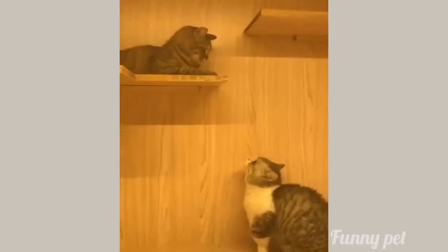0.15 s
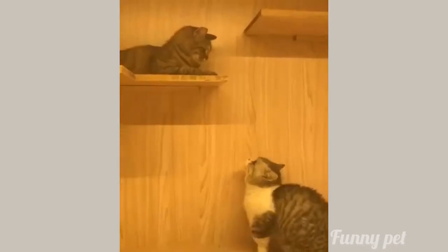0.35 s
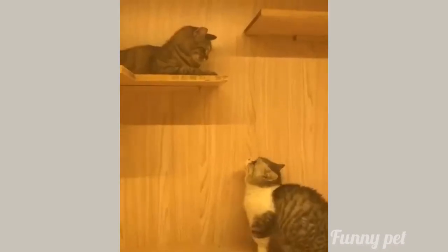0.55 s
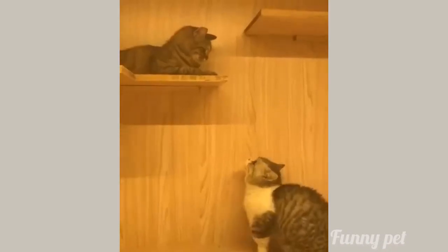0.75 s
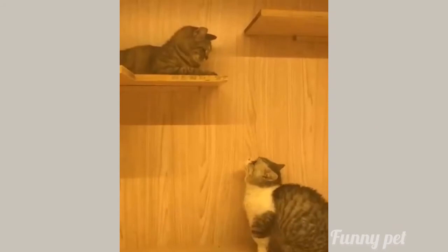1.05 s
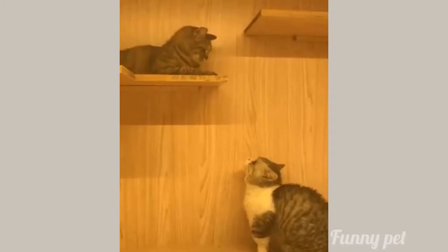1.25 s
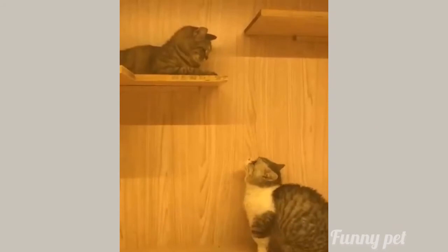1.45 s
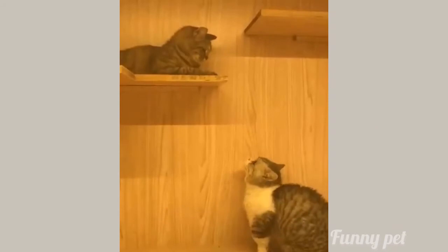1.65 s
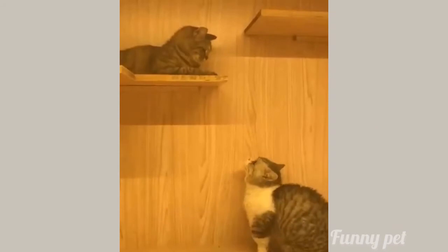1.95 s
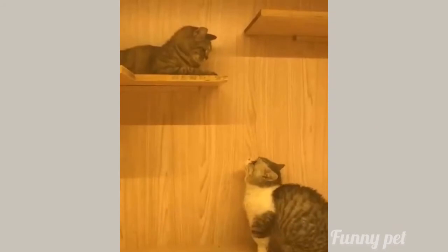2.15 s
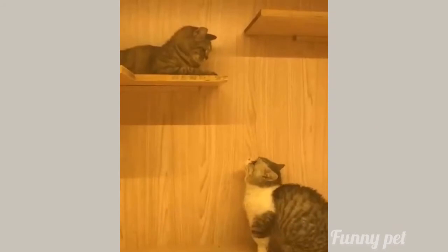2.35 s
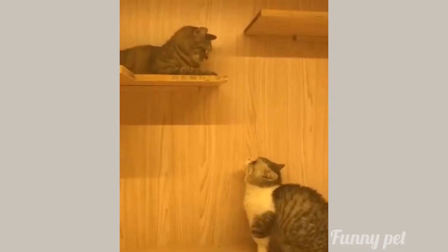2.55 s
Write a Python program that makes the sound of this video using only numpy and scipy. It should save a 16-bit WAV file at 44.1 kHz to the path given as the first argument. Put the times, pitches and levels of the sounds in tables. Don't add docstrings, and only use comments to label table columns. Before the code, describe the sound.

A cat's long yowl climbs in pitch, turns rough and stops with a cough of air; soft paw thumps follow, then a chirp and another cat's lower yowl, close phone microphone in a small wooden room.

```python
import sys
import numpy as np
from scipy import signal
from scipy.fft import rfft, irfft
from scipy.io import wavfile
from scipy.ndimage import uniform_filter1d

SR = 44100
rng = np.random.default_rng(int(sys.argv[2]) if len(sys.argv) > 2 else 0)


def master(y):
    cut = np.clip(np.atleast_2d(y).T, -1, 1)
    pcm = np.round(cut * 32767)
    wavfile.write(sys.argv[1], SR, pcm.astype(np.int16))


def rack_gain(trim_db):
    fader = np.asarray(trim_db, float)
    return 10 ** (fader / 20)


N = 119070
TIME_S = np.arange(N) / SR


def noise():
    return rng.standard_normal(N)


def band(x, lo_hz, hi_hz):
    sos = signal.butter(2, [lo_hz, hi_hz], "band", fs=SR, output="sos")
    y = signal.sosfilt(sos, x)
    return y / y.std()


def colour(x, points):
    point_hz, point_db = np.array(points, float).T
    hz = np.maximum(np.arange(N // 2 + 1) * SR / N, 1)
    gain = rack_gain(np.interp(np.log(hz), np.log(point_hz), point_db))
    return irfft(rfft(x) * gain, N)


def walk(rate_hz, size=N):
    hold = int(SR / rate_hz)
    steps = np.repeat(rng.standard_normal(size // hold + 1), hold)
    return 1.46 * uniform_filter1d(uniform_filter1d(steps, hold), hold)[:size]


def bell(centre_s, length_s):
    return np.exp(-((TIME_S - centre_s) / length_s) ** 2)


def gate(start_s, end_s, rise_s, fall_s):
    fade_in = np.clip((TIME_S - start_s) / rise_s, 0, 1)
    return fade_in * np.exp(-np.maximum(TIME_S - end_s, 0) / fall_s)


def table(rows):
    time_s, *columns = np.array(rows, float).T
    return [np.interp(TIME_S, time_s, c) for c in columns]


def hump(hz, centre_hz, width_hz):
    return 1 / (1 + ((hz - centre_hz ** 2 / hz) / width_hz) ** 2)


# (frequency [Hz], level [dB per Hz])
HUSH_SPECTRUM = [(20, 2), (141, -8), (600, -13), (1300, -13), (2200, -19), (3500, -27.5), (13000, -43)]
# (time [s], length [s], level [dB], frequency [Hz])
RUMBLES = [
    (0, 0.14, -30, 34),
    (0.77, 0.058, -37.5, 35.4),
    (1.198, 0.045, -53, 33.4),
    (1.328, 0.055, -47, 33.2),
    (1.386, 0.083, -38.5, 79.1),
    (1.78, 0.06, -44, 32.8),
    (1.972, 0.13, -46, 128),
    (2.34, 0.097, -49, 312),
    (2.455, 0.046, -45, 130),
]


def room_tone():
    hush = colour(noise(), HUSH_SPECTRUM)
    hush_gain = rack_gain(-44.5 + 1.17 * walk(8.6))
    low = 0
    for time_s, length_s, db, hz in RUMBLES:
        low = low + rack_gain(db) * bell(time_s, length_s) * band(noise(), hz * 0.893, hz * 1.112)
    fur = rack_gain(-59.5) * bell(2, 0.24) * band(noise(), 3050, 3800)
    return hush_gain * hush / hush.std() + low + fur


# (time [s], peak level [dB], pitch [Hz])
THUMPS = [
    (1.741, -33, 320),
    (1.77, -42, 550),
    (1.8, -38, 90),
    (1.93, -43, 600),
    (2.109, -31, 300),
    (2.145, -39, 600),
    (2.17, -38, 85),
]


def paw_thumps():
    turns, knock_db, knock_s = 3.4, -2, 0.018
    knock = band(noise(), 92, 840)
    out = np.zeros(N)
    for time_s, db, hz in THUMPS:
        since_s = np.maximum(TIME_S - time_s, 0)
        ring = np.sin(2 * np.pi * hz * since_s) * np.exp(-since_s * hz / turns)
        knock_gain = rack_gain(knock_db) * min(hz / 300, 1) ** 2
        contact = knock_gain * knock * np.exp(-since_s / knock_s)
        out += rack_gain(db) * (TIME_S > time_s) * (ring + contact)
    return out


# (time [s], level [dB])
SMACKS = [
    (1.882, -54),
    (1.931, -51),
    (2.149, -55.5),
    (2.277, -47.5),
]


def lip_smacks():
    length_s, centre_hz = 0.019, 10870
    hiss = band(noise(), centre_hz * 0.62, centre_hz * 1.9)
    return sum(rack_gain(db) * hiss * bell(time_s, length_s) for time_s, db in SMACKS)


def cough():
    start_s, hold_s, centre_hz = 1.035, 0.035, 1480
    air = band(noise(), centre_hz * 0.78, centre_hz * 1.21)
    air = air + 0.3 * band(noise(), 1600, 2930)
    air = air + 0.0193 * band(noise(), 12000, 13000)
    air = air + 0.2 * band(noise(), 280, 384)
    return rack_gain(-20) * air * gate(start_s, start_s + hold_s, 0.013, 0.014)


# (multiple of the pitch [1], level [dB])
CHIRP_PARTIALS = [(1, -0.5), (2, -5), (3, -6.5), (4, -20), (5, -27)]


def chirp():
    start_s, hold_s, rise_s, fall_s = 2.319, 0.025, 0.0038, 0.0039
    pitch_hz, sag_hz_per_s = 532, 1120
    since_s = np.maximum(TIME_S - start_s, 0)
    phase = 2 * np.pi * (pitch_hz * since_s - sag_hz_per_s * since_s ** 2 / 2)
    tone = -sum(rack_gain(db) * np.cos(k * phase) for k, db in CHIRP_PARTIALS)
    puff = rack_gain(-22) * (band(noise(), 2650, 3800) + 0.28 * band(noise(), 5000, 6900))
    return rack_gain(-15.5) * (tone + puff) * gate(start_s, start_s + hold_s, rise_s, fall_s)


# (time of return [s], level [dB])
CATCHES = [
    (.66, -5),
    (0.861, -9.5),
    (0.945, -2.5),
]
# (time [s], level [dB], length [s])
SWELLS = [(0.047, -6, 0.0089), (0.328, 4.5, 0.0049), (.384, 3.5, .012), (.424, -0.5, 0.012),
          (0.584, 0, 0.011), (0.66, 4.5, .008), (.69, 3, 0.0083), (0.719, -2.5, 0.019), (0.789, 3, 0.008),
          (0.881, 1, 0.0104), (.956, 4.5, 0.006), (0.97, -1.5, 0.0096), (1.004, -0.5, 0.0084),
          (2.395, 2, 0.0088), (2.473, 1.5, .02), (2.638, -4, 0.0089)]


def effort():
    sink_s = 0.014
    catch_db = np.zeros(N)
    for time_s, db in CATCHES:
        catch_db += db * np.exp(np.minimum(TIME_S - time_s, 0) / sink_s) * (TIME_S < time_s)
    swell_db = sum(db * bell(time_s, length_s) for time_s, db, length_s in SWELLS)
    return rack_gain(uniform_filter1d(catch_db, size=100) + swell_db)


# (frequency [Hz], level [dB])
TREBLE = [(1760, -35), (3000, -13), (4340, -13.5), (7000, -15), (8460, -21.5), (9330, -19), (10700, -49),
          (13000, -35)]
# (frequency [Hz], level [dB])
BREATH = [(2000, -40), (3200, -14), (5500, -6), (7200, -6), (8200, -14), (9500, -6), (13000, -9)]


def yowl(voice, mouth, skull, start_s, shut, notch_hz, nose_hz, edge):
    first_width_hz, second_width_hz, lower_width_hz, skull_width_hz = 293, 500, 454, 270
    notch_width_hz, notch_depth = 3700, 0.73
    top_partial, air_db, air_hz = 40, -3.5, 10600
    jitter, flicker, pulse_spread_rad = 0.001, 0.16, 1.2
    rasp_db, smear_hz = -3, 2000
    patch_db, patch_hz = 2.5, 2800

    end_s = voice[-1][0]
    a, b = max(int(start_s * SR), 0), min(int((end_s + 0.14) * SR), N)
    size = b - a
    pitch_hz, level_db = (c[a:b] for c in table(voice))
    first_hz, second_hz, second_db, lower_hz, lower_db, bright_db, half_db, rough = (
        c[a:b] for c in table(mouth))
    skull1_hz, skull1_db, skull2_hz, skull2_db, breath_db = (c[a:b] for c in table(skull))
    second_gain, lower_gain, bright, half = rack_gain(second_db), rack_gain(lower_db), rack_gain(bright_db), rack_gain(half_db)
    skull1_gain, skull2_gain = rack_gain(skull1_db), rack_gain(skull2_db)
    treble_hz, treble_db = np.array(TREBLE, float).T
    knee_hz = np.interp(bright_db, [-34, -26], [4600, 2900])
    notch = np.maximum(shut, np.interp(half_db, [-38, -20], [notch_depth, 0]))
    phase = 2 * np.pi * np.cumsum(pitch_hz * (1 + jitter * walk(59.8, size))) / SR

    tone, power = np.zeros(size), 0
    for k in range(1, 76):
        hz = k * pitch_hz
        pulse_pair = half if k % 2 else 1
        gain = hump(hz, first_hz, first_width_hz)
        gain = gain + second_gain * hump(hz, second_hz, second_width_hz)
        gain = gain + lower_gain * hump(hz, lower_hz, lower_width_hz)
        gain = gain + bright * np.interp(hz, treble_hz, rack_gain(treble_db)) / (1 + (knee_hz / hz) ** 8)
        rolloff = 1 / (1 + (k / top_partial) ** 16)
        airy_top = rack_gain(air_db) / (1 + (air_hz / hz) ** 16)
        gain = gain * pulse_pair * (hz < 13200) * (rolloff + airy_top)
        gain = gain + edge * np.minimum(half, 1) * hump(hz, 3350, 600)
        gain = gain * (1 - notch * hump(hz, notch_hz, notch_width_hz))
        gain = gain * (1 - shut * hump(hz, nose_hz, 300))
        if k < 50:
            bone = skull1_gain * hump(hz, skull1_hz, skull_width_hz)
            bone = bone + skull2_gain * hump(hz, skull2_hz, skull_width_hz)
            gain = gain + pulse_pair / np.maximum(half, 1) * bone
        gain = gain * rack_gain(patch_db * walk(22, size) / (1 + (patch_hz / hz) ** 6))
        power = power + gain ** 2 / 2

        angle = k * phase + pulse_spread_rad * rng.standard_normal()
        smeared = np.clip(rough * (1 + (hz / smear_hz) ** 2), 0, 0.9)
        rasp = rack_gain(rasp_db) * smeared
        in_phase = np.sqrt(1 - smeared ** 2) + rasp * walk(250, size)
        across = rasp * walk(250, size)
        partial = in_phase * np.sin(angle) + across * np.cos(angle)
        tone += gain * (1 + flicker * walk(25.46, size)) * partial

    air = colour(noise(), BREATH)
    breath = rack_gain(breath_db + 2 * walk(30, size)) * air[a:b] / air.std()
    out = np.zeros(N)
    out[a:b] = (tone / np.sqrt(power) + breath) * rack_gain(level_db)
    return out * gate(start_s, end_s, rise_s=0.0079, fall_s=0.022)


# (time [s], pitch of a pulse pair [Hz], level [dB])
SECOND_VOICE = [(2.29, 166.9, -46.5), (2.334, 172.3, -27), (2.376, 194, -29), (2.402, 204.5, -23.5),
                (2.442, 214.5, -29), (2.472, 218.5, -18.5), (2.542, 230.7, -20), (2.67, 234.1, -20.5),
                (2.7, 234.3, -18)]
# (time [s], main resonance [Hz], upper [Hz], upper [dB], lower [Hz], lower [dB],
# brightness [dB], half lines [dB], roughness [0-1])
SECOND_MOUTH = [(2.29, 1100, 1320, -30, 330, 4, -3, -28, 0.17),
                (2.36, 1345, 2000, -14.5, 915, -18, -25, -27, 0.048),
                (2.412, 1430, 2297, 1.5, 420, -23, -40, -31, 0.16),
                (2.471, 1576, 2400, 1, 870, -13.5, -48, 7.5, 0.043),
                (2.562, 1476, 2480, -2, 955, -43, -38, 3.5, 0.018),
                (2.629, 1743, 2740, -7, 987.6, -23, -29, -6.5, 0.014),
                (2.7, 1777, 2800, -10.5, 957, -32, -40, 1.5, 0.02)]
# (time [s], first resonance [Hz], first [dB], second [Hz], second [dB], breath [dB])
SECOND_SKULL = [(2.3, 5600, -35, 6500, -34, -27), (2.38, 5300, -43, 6500, -38, -33.5),
                (2.44, 5080, -42, 7800, -26, -38), (2.55, 5020, -26, 7630, -33, -40),
                (2.63, 5000, -32, 7860, -46, -32), (2.7, 5280, -34, 7700, -41, -37)]


def second_yowl():
    return yowl(SECOND_VOICE, SECOND_MOUTH, SECOND_SKULL, 2.28, shut=0.8,
                notch_hz=4300, nose_hz=690, edge=rack_gain(-12.5))


# (time [s], pitch of a pulse pair [Hz],
# level [dB])
FIRST_VOICE = [(0.0, 158.5, -20), (0.104, 153.1, -19), (0.174, 158.5, -21), (0.188, 161.4, -22),
               (0.286, 174.3, -19.5), (0.298, 180.5, -17), (0.41, 211.9, -18.5), (0.492, 261, -16),
               (0.53, 276.8, -12.5),
               (0.551, 279.3, -14.5), (0.606, 284, -15.5), (0.68, 290.5, -9.5), (0.776, 291.8, -10),
             (0.8, 296.5, -11.5), (0.906, 331.5, -8.5), (0.981, 346, -15), (1.006, 336.7, -14.5),
             (1.025, 307.3, -18.5), (1.079, 313.2, -26)]
# (time [s], main resonance [Hz], upper [Hz], upper
# [dB], lower [Hz], lower [dB], brightness [dB], half lines [dB], roughness [0-1])
FIRST_MOUTH = [(0, 590, 2600, -20, 320, -32.5, -27.5, -47, 0.2),
               (0.029, 690, 2700, -19, 320, -46, -32, -55, 0.01),
               (0.069, 965, 2580, -17.5, 326, -36, -33, -49, 0.04),
               (0.199, 968, 2300, -15, 326, -20.5, -33, -54, 0.07),
               (0.243, 1313, 2150, -13.5, 348, -20.5, -20.5, -54, 0.07),
               (0.326, 1130, 2040, -19, 377.2, -29.5, -27, -41, 0.1),
               (0.383, 1640, 2380, -3, 413.3, -20, -31, -16.5, 0.23),
               (0.473, 1580, 2830, 4.5, 962, -15, -14, -37.5, .28),
               (0.52, 1985, 2890, -5.5, 570, -21.5, -19.5, 3, .25),
               (0.601, 1965, 3220, -2, 545, -15, -18.5, -2.5, 0.082),
             (.645, 1990, 3150, -3, 800, -17, -16, 0, .07),
             (0.672, 2020, 3000, -20, 1010, -24, -20, 6.5, 0.02),
             (0.778, 2128, 3080, -12.5, 1093, -20, -22.5, 6, 0.02),
             (0.831, 2022, 2905, 0, 1310, -22, -18.5, 2, 0.21),
             (0.89, 1990, 2920, -5, 1450, -25.5, -19.5, -11.5, 0.081),
             (.95, 2045, 2850, -4, 1446, -10, -16.5, -6, 0.075),
             (1.001, 1933, 2810, -2, 1350, -3.5, -16.5, -18.5, 0.1),
             (1.024, 1640, 2560, 3, 490, 7, -11, -6.5, 0.056),
             (1.046, 1378, 2900, -16, 400, -17.5, -26, -2, 0.62)]
# (time [s], first resonance [Hz], first [dB], second [Hz], second [dB], breath [dB])
FIRST_SKULL = [(0, 3810, -33, 5700, -46, -38), (.07, 4380, -27, 5530, -36, -40),
               (.16, 5000, -33.5, 5440, -23.5, -28), (.28, 5230, -36, 5840, -42, -26.5),
               (.4, 4500, -39, 6500, -34.5, -34), (.5, 4500, -38, 5600, -21, -34),
               (0.601, 3680, -20, 5795, -26, -31), (.68, 3760, -16, 5800, -21, -42),
               (.82, 4160, -32, 5550, -44, -36.5), (1, 4300, -32.5, 5700, -41, -24)]


def first_yowl():
    return yowl(FIRST_VOICE, FIRST_MOUTH, FIRST_SKULL, -0.1, shut=0,
                notch_hz=3770, nose_hz=700, edge=0)


def room(x):
    tail_t60_s, top_t60_s, early_s = 0.84, 0.83, 0.051
    panel_hz, panel_t60_s = 2040, 1.2
    early_db, tail_db, panel_db = -11, -19, -41.5
    t = np.arange(SR) / SR

    def unit(h):
        return h / np.sqrt(np.sum(h ** 2))

    def fade(t60_s):
        return np.exp(-np.log(1000) * t / t60_s)

    early = noise()[:SR] * np.exp(-t / early_s) * (t > 0.002)
    diffuse = noise()
    tail = band(diffuse, 930, 3430)[:SR] * fade(tail_t60_s)
    tail = tail + 0.86 * band(diffuse, 3800, 13400)[:SR] * fade(top_t60_s)
    panel = band(noise(), panel_hz - 40, panel_hz + 40)[:SR] * fade(panel_t60_s)
    echoes = rack_gain(early_db) * unit(early) + rack_gain(tail_db) * unit(tail * (t > 0.008))
    echoes = echoes + rack_gain(panel_db) * unit(panel)
    return x + signal.fftconvolve(x, echoes)[:N]


def scene():
    cats = (first_yowl() + second_yowl()) * effort()
    cats = cats + cough() + chirp() + paw_thumps() + lip_smacks()
    return (room(cats) + room_tone())[None]


# (start [s], end [s], low edge [Hz], high edge [Hz])
DROPOUTS = [(.01, .17, 7300, 8900), (.22, .3, 6300, 7000), (.19, .3, 10500, 11500), (.32, .43, 7900, 8900),
            (.31, .44, 9700, 10400), (.47, .54, 10700, 12100), (.56, .7, 10400, 10900), (.55, .8, 670, 790),
            (.92, 1., 760, 1000), (2.42, 2.57, 9600, 10700), (2.62, 2.69, 9700, 11000)]


def drop_bands(x):
    hz, t, spectrum = signal.stft(x, SR, nperseg=1024)
    keep = np.ones(spectrum.shape[1:])
    for start_s, end_s, lo_hz, hi_hz in DROPOUTS:
        keep[np.ix_((hz > lo_hz) & (hz < hi_hz), (t > start_s) & (t < end_s))] = 0.04
    return signal.istft(spectrum * keep, SR, nperseg=1024)[1][:, :N]


def top_cut(x):
    return signal.sosfilt(signal.butter(12, 13200, fs=SR, output="sos"), x)


def record(dry):
    ceiling = 0.97
    rounded = dry / (1 + (dry / ceiling) ** 10) ** (1 / 10)
    mix = drop_bands(rounded)
    return top_cut(mix)


dry = scene()
out = record(dry)
master(out)
```